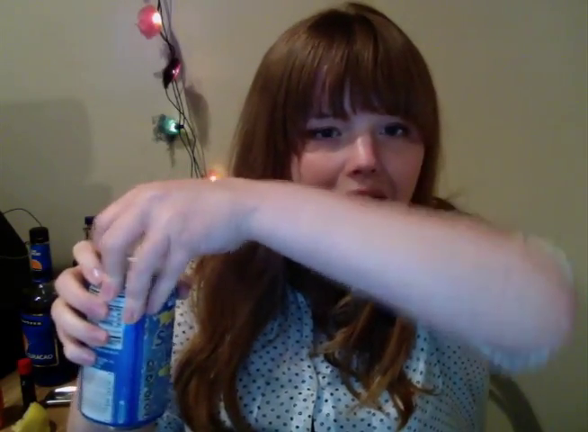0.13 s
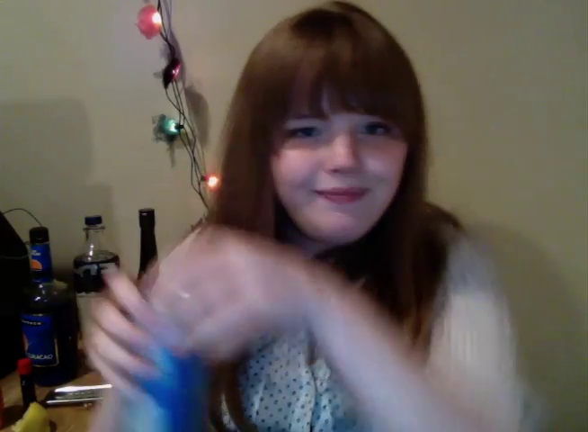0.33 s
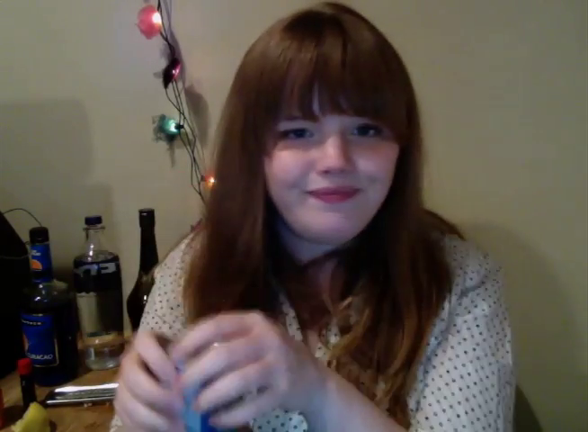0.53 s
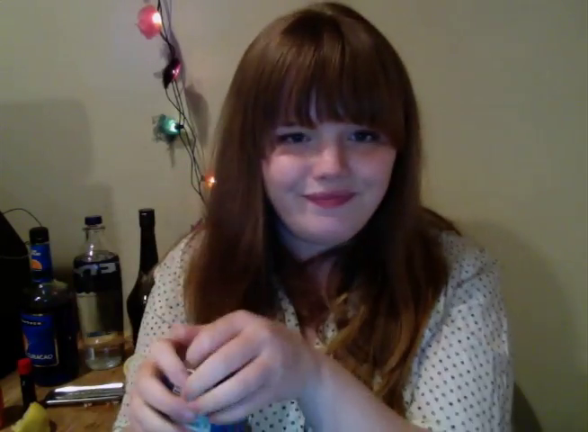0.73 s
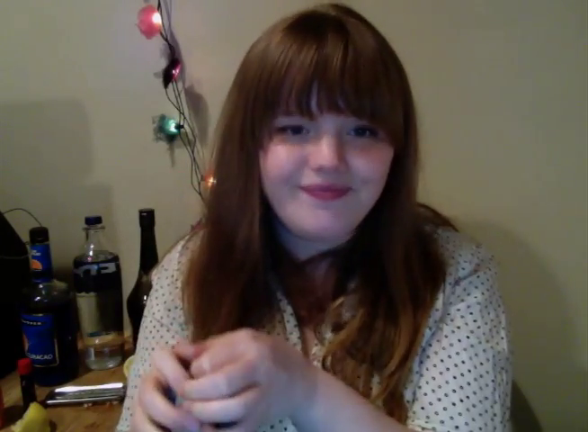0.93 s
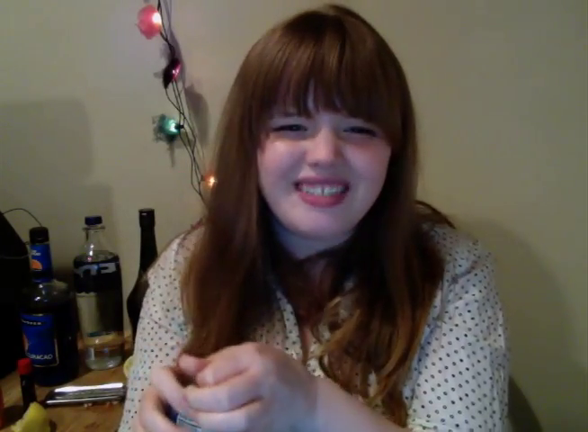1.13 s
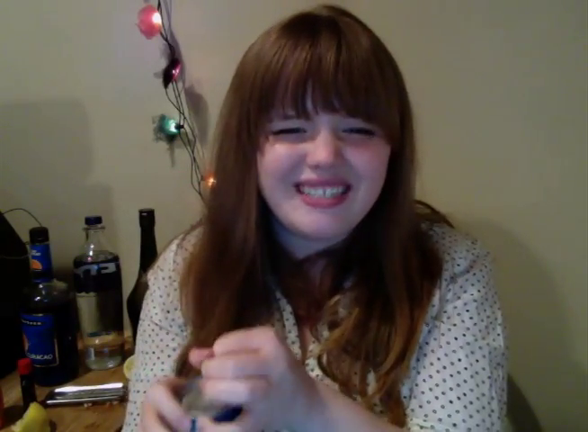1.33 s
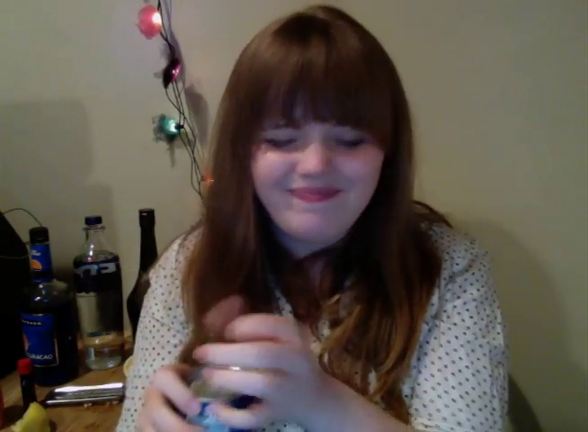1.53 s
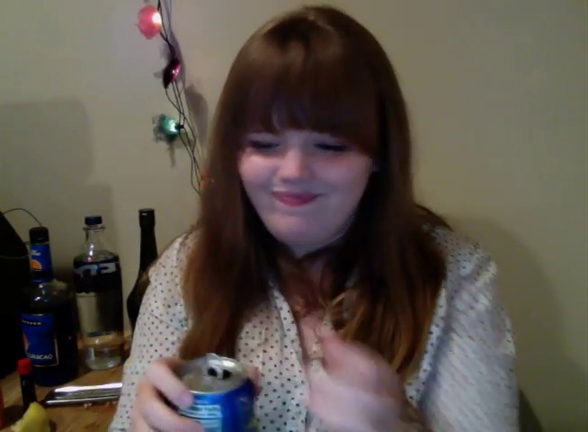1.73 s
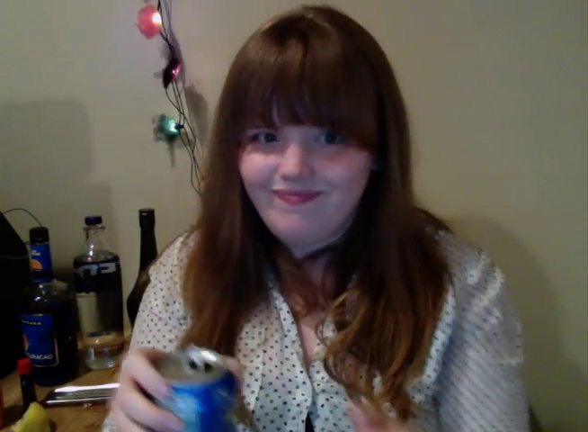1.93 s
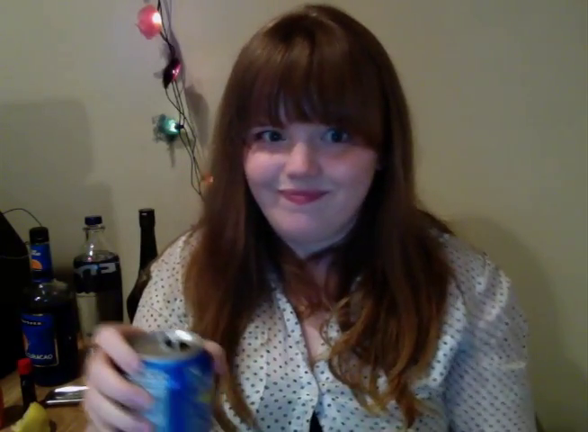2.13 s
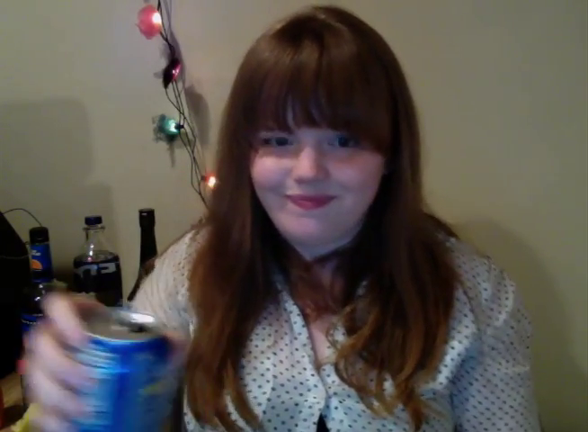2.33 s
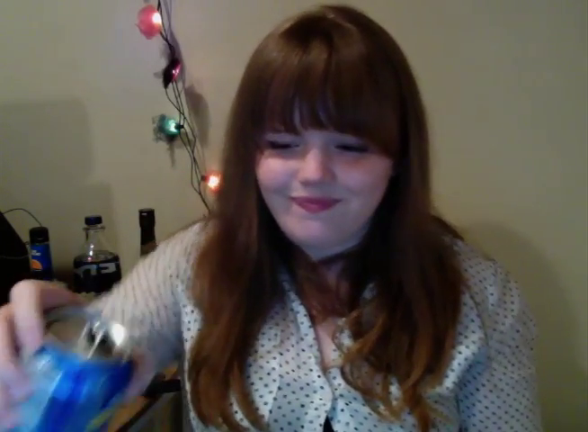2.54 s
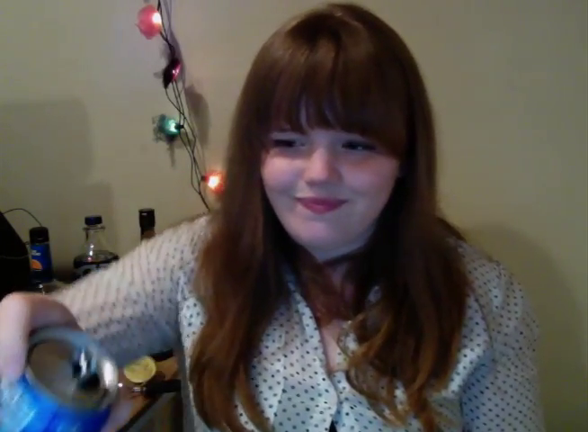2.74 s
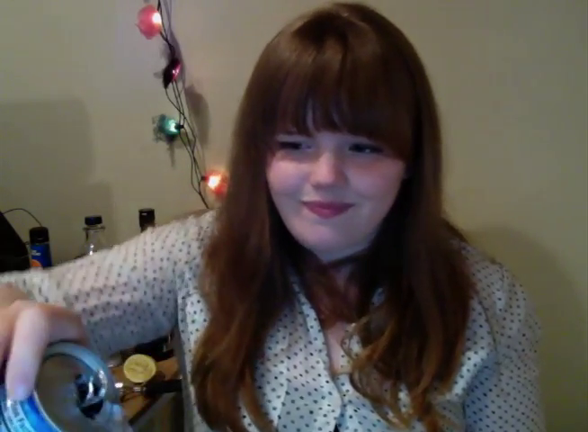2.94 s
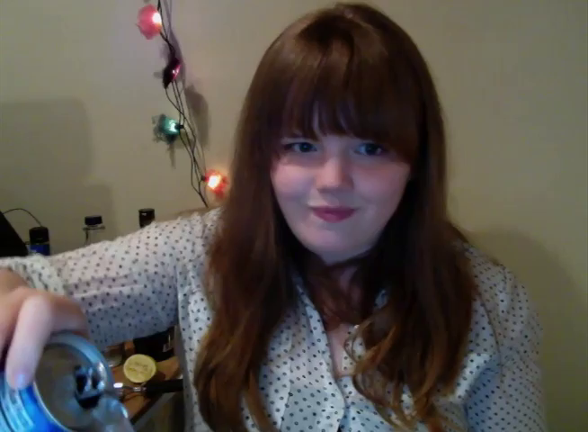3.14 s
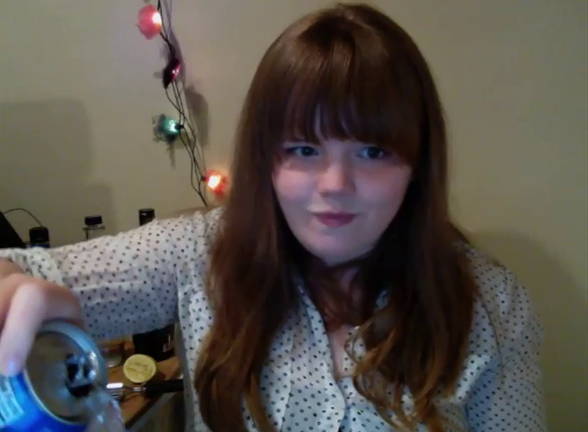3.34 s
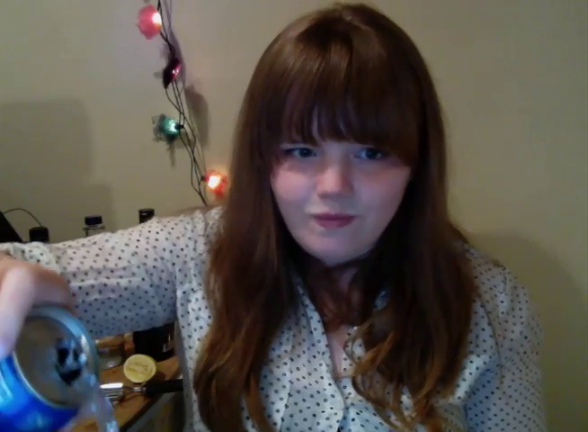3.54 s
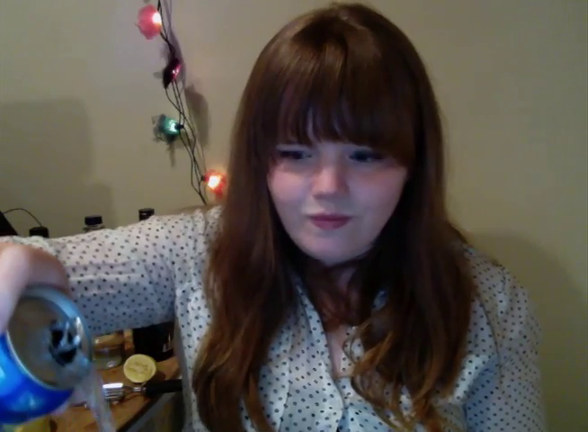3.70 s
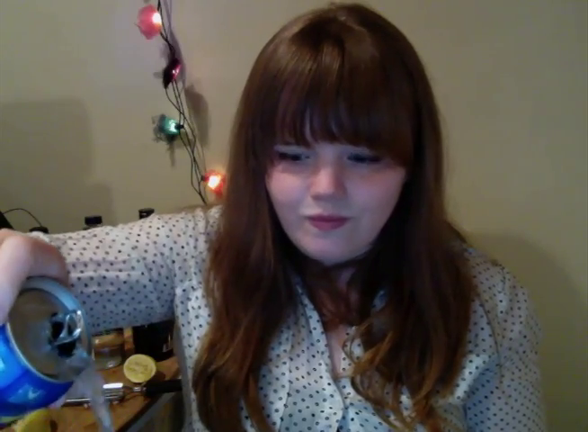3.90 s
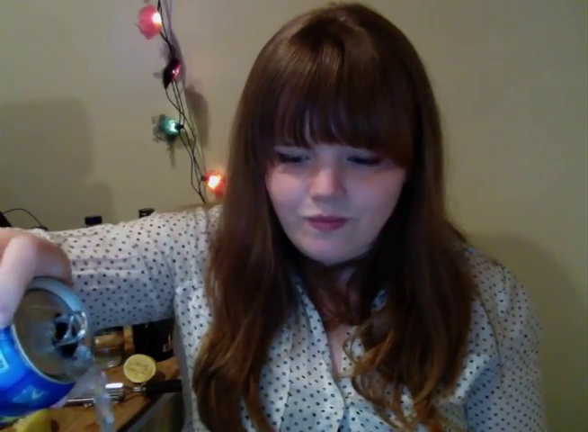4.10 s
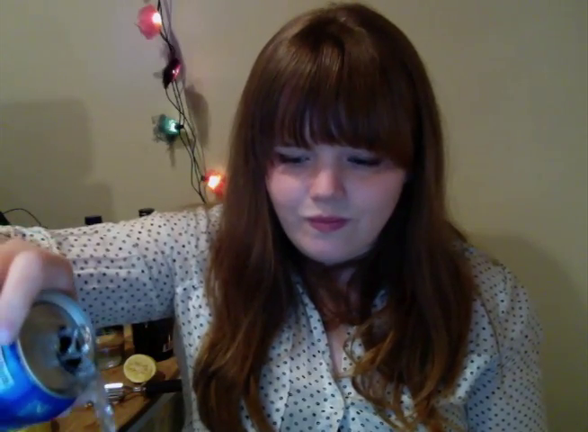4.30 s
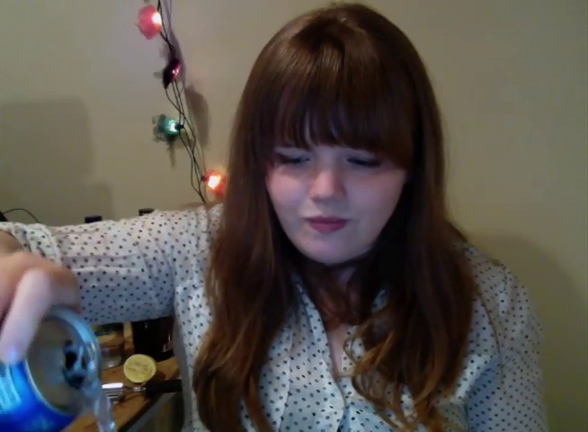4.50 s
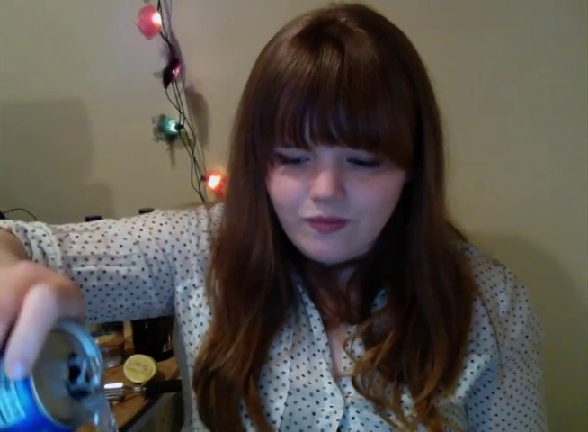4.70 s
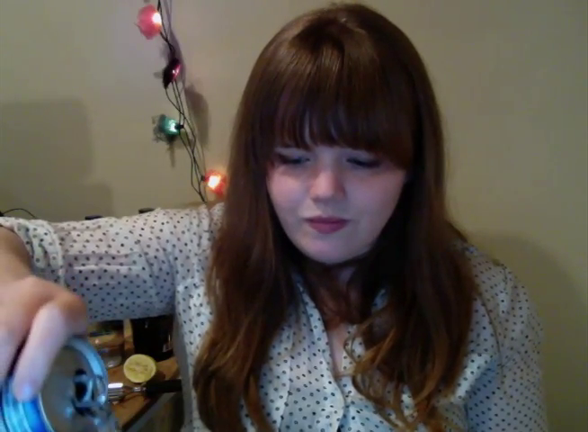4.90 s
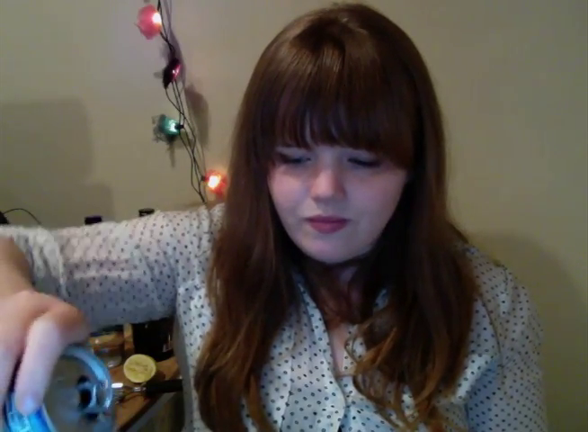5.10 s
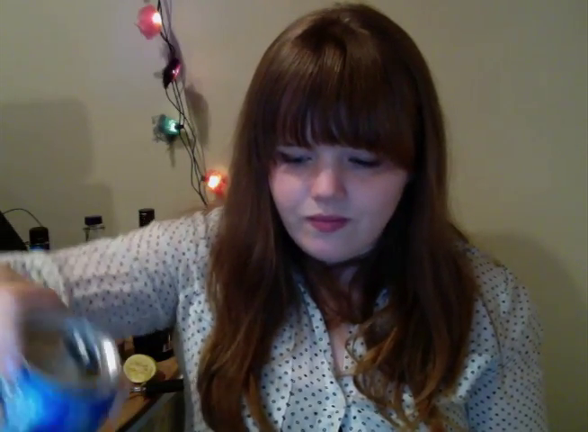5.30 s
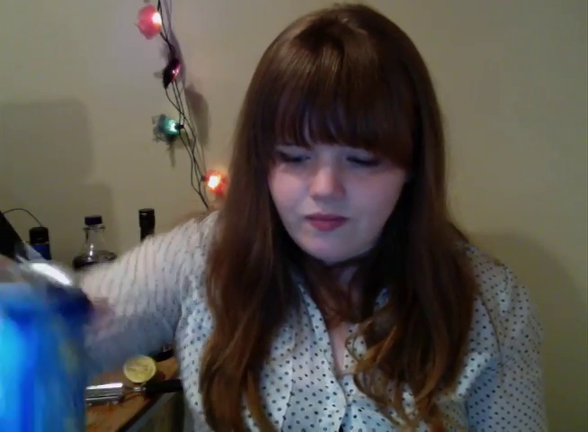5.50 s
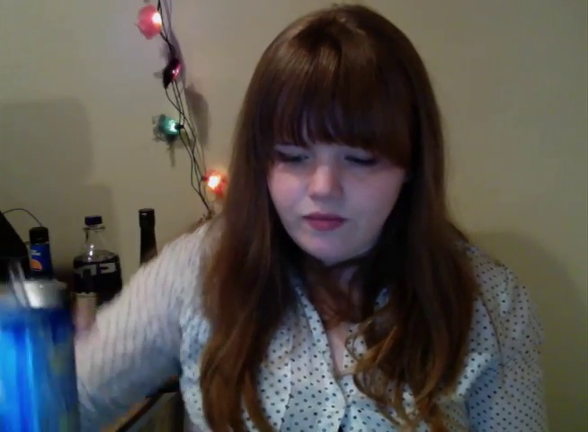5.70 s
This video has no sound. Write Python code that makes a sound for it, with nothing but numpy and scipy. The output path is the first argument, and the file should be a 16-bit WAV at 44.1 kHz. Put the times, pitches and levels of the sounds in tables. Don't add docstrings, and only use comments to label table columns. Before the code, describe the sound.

Faint ticks, a loud metallic can opening with a clipped hiss and thunk, a pause, then a bubbly, glugging pour that fizzes out.

```python
import sys
import numpy as np
from scipy import signal
from scipy.fft import rfft, irfft, next_fast_len
from scipy.io import wavfile

SR = 44100
rng = np.random.default_rng(int(sys.argv[2]) if len(sys.argv) > 2 else 0)


def wav_out(sig):
    wavfile.write(sys.argv[1], SR, np.round(np.clip(np.atleast_2d(sig).T, -1, 1) * 32767).astype(np.int16))


def volts_from_decibels(level):
    exponent = np.asarray(level, float) / 20
    return 10 ** exponent


N = 258029

# (frequency [Hz], density [dB per Hz])
HUSH_COLOUR = [(30, -14), (60, -21), (88, -24.5), (112, -1.5), (200, -1), (330, -1.5), (420, -10.5),
               (800, -13.5), (2200, -22.5), (2800, -19.5), (5000, -27), (16000, -38)]
# (time [s], level [dB])
HUSH_LEVEL = [(0, -59), (1.0, -62.5), (1.4, -56.5), (2.05, -61), (2.35, -66), (2.95, -64.5), (3.2, -57.5),
              (3.9, -55.5), (5.85, -60.5)]
# (frequency [Hz], width [Hz], level [dB])
FAN_LINES = [(59.3, 4, -17), (114.5, 5.5, -16.5), (349.2, 0.72, 3), (775, 1.7, -11.5), (2780, 15, -17),
             (13006, 3, -27)]
# (onset time [s], level [dB], fade [dB per s])
HISSES = [
    (0, -84, 19),
    (1.3, -56, 19.5),
    (4.9, -66, 15.5),
]

# (time [s], peak level [dB])
NAIL_TAP = (0.1375, -51)
# (frequency [Hz], level [dB], t60 [s])
CAN_MODES = [(924, 3, 0.12), (1880, 5, 0.046), (1950, 10, 0.056), (3365, 1, 0.059), (3420, -3, 0.061),
             (4230, 7, 0.03), (4870, -1, 0.03), (5600, 6, 0.032), (5670, 2, 0.035), (6760, 2, 0.054),
             (6750, -2, 0.06), (8440, -5, 0.061)]
# (time [s], peak level [dB], pitch [Hz], ring [cycles])
TICKS = [(0.568, -41.5, 1950, 35), (0.612, -51, 10100, 53), (0.615, -45, 4750, 26), (0.622, -48, 5700, 75),
         (0.884, -37, 9574, 40), (0.885, -40, 10400, 36), (0.891, -46.5, 10000, 30),
         (0.921, -50, 12200, 45), (0.921, -48, 14390, 46), (0.926, -58, 2180, 51), (0.921, -50, 13390, 45),
         (2.46, -54, 2370, 33), (5.655, -48, 4996, 44)]

# (time [s], peak level [dB], low ring [Hz], tab ring level [dB], crack level [dB])
SNAPS = [
    (0.9612, 0, 2033, -1.5, -16),
    (1.1149, -18.5, 2603, -6, 0),
    (1.1185, -4, 2300, 3, -4.5),
    (1.1262, -8.5, 2309, 5, -5),
]
# (frequency [Hz], level [dB], t60 [s])
LID_MODES = [(1100, -19.5, 0.019), (2430, -4.5, .005), (5450, -14, 0.006), (1550, -10, .006),
             (3900, -20, .006), (6500, -15, .006)]
# (time [s], level [dB])
JET_LEVEL = [
    (1.113, -82.5),
    (1.119, -21),
    (1.143, -43),
    (1.151, 4),
    (1.172, -5),
    (1.2, -15),
    (1.25, -19),
    (1.3, -34.5),
    (1.4, -84),
]
# (frequency [Hz], density [dB per Hz])
JET_COLOUR = [(59, -64), (100, -39.5), (335, -20), (634, -31), (1100, -0.5), (1450, -14), (2220, 0),
              (3320, -8), (4020, 3.5), (4900, -6), (6840, -13), (8460, -6), (11900, -8), (16000, -19)]
# (frequency [Hz], width [Hz], level [dB])
JET_RINGS = [(1290, 300, -15), (2400, 840, -27), (4250, 460, -14), (5630, 430, -14)]
# (time [s], peak level [dB], pitch [Hz], ring [cycles])
THUNKS = [
    (1.15, 0, 1050, 24),
    (1.2215, 12.5, 1127, 15),
    (1.229, -0.5, 965, 24),
]
# (time [s], peak level [dB], pitch [Hz], ring [cycles])
TABLE_KNOCKS = [
    (1.15, -24, 304.4, 8),
    (1.15, -44, 110, 4),
    (1.225, -36, 50, 5),
    (1.225, -30.5, 300, 8),
    (2.988, -50, 90, 5),
]
TAB_HZ, TAB_SAG_HZ_PER_S = 5800, 320000

# (time [s], level [dB])
STREAM_LEVEL = [
    (2.97, -59),
    (3.04, -44),
    (3.65, -45.5),
    (3.92, -36),
    (4.3, -42.5),
    (4.57, -48.5),
    (4.74, -57.5),
    (5.1, -54),
    (5.45, -91),
]
# (time [s], peak level [dB], pitch [Hz], ring [cycles])
SPLASH = [(2.983, -36, 910, 9.1), (2.983, -33.5, 2500, 22), (2.988, -20.5, 1640, 27),
          (2.988, -38, 3500, 40), (2.988, -23, 6500, 24), (2.988, -6.5, 7900, 4.2),
          (2.997, -19.5, 3950, 29), (3.0, -9, 7700, 5.7), (2.996, -24, 2260, 35), (3.018, -25, 2370, 30),
          (2.998, -29.5, 4700, 70), (3.005, -28.5, 5600, 67), (3.16, -32, 1150, 15), (3.13, -33, 1100, 14),
          (3.48, -35, 1130, 16), (3.8, -31, 940, 14), (3.078, -22, 354, 6.8), (3.429, -27, 420, 8.5),
          (3.822, -26, 470, 7.4), (3.5, -27, 440, 7)]
# (time [s], peak level [dB], pitch [Hz])
GLUGS = [(2.988, -13, 686), (3.017, -20.5, 674), (3.078, -22, 684), (3.114, -31, 785), (3.142, -32, 729),
         (3.429, -28, 806), (3.451, -31, 857), (3.524, -40, 976), (3.788, -26.5, 960), (3.82, -27, 925),
         (3.868, -16.5, 884), (3.913, -22.5, 725), (3.948, -24.5, 960), (3.978, -25.5, 880),
         (4.004, -28, 705), (4.037, -19.5, 735), (4.072, -27, 735), (4.097, -16, 1034), (4.143, -32, 756),
         (4.18, -27, 775), (4.209, -16, 718), (4.266, -28, 826), (4.2905, -15, 877), (4.3125, -18, 800),
         (4.375, -17.5, 890), (4.469, -21, 900), (4.511, -28, 870), (4.58, -29.5, 960),
         (4.961, -31.5, 1036), (5.135, -31, 899)]
# (time [s], peak level [dB], pitch [Hz])
PLOPS = [(3.193, -36, 1000), (3.566, -47, 739), (3.583, -36, 790), (3.641, -53, 950), (3.671, -51, 766),
         (3.703, -36.5, 734), (3.755, -31, 993), (3.857, -23, 896), (4.047, -32, 770), (4.11, -23, 1060),
         (4.23, -22.5, 730), (4.405, -38, 980), (4.481, -24.5, 840), (4.609, -44, 946), (4.65, -33.5, 820),
         (4.716, -39, 972), (4.793, -64, 810), (4.807, -46.5, 983), (4.937, -48.5, 1100),
         (4.985, -34.5, 1053), (5.03, -50, 796), (5.056, -45, 788), (5.112, -37.5, 856), (5.157, -41, 960)]
# (time [s], peak level [dB], pitch [Hz])
BUBBLES = [(2.987, -1, 2400), (3.1133, -42, 1690), (3.1306, -36.5, 1360), (3.1498, -37, 2540),
           (3.1988, -29, 2700), (3.4655, -32, 2320), (3.6264, -37, 2530), (3.7125, -35.5, 2370),
           (3.912, -30, 1600), (3.947, -31, 1660), (4.013, -25, 3200), (4.0355, -29, 1570),
           (4.097, -26, 1540), (4.1845, -31, 1430), (4.2115, -32, 1040), (4.262, -31, 1560),
           (4.29, -34, 1560), (4.383, -35, 1530), (4.4726, -32, 1045), (4.508, -29, 2810),
           (4.6073, -33.5, 2860), (4.7435, -33, 2400), (4.9863, -36, 1474), (5.011, -29, 2800)]
# (time [s], peak level [dB], pitch [Hz])
BEADS = [(2.9877, -18, 3320), (3.235, -39, 4170), (3.2598, -34, 5620), (3.361, -40, 5670), (3.4, -31, 5390),
         (3.468, -35.5, 4300), (3.707, -40, 5600), (3.738, -33, 4280), (3.757, -29, 5300),
         (3.792, -29, 4160), (3.823, -23, 4900), (3.867, -30, 5250), (3.9122, -25.5, 4120),
         (3.981, -31, 5400), (4.0142, -27, 4540), (4.1889, -47, 5100), (4.2316, -27.5, 5400),
         (4.2894, -31, 4620), (4.3125, -23, 5340), (4.4383, -45, 5700), (4.4532, -39, 3450),
         (4.568, -37, 4140), (4.6049, -37, 4400), (4.6465, -40, 5370), (4.978, -35.5, 6170),
         (5.011, -35, 3200), (5.0973, -46, 4160)]
# (time [s], peak level [dB], pitch [Hz])
BLIPS = [(3.2, -32, 1820), (3.2822, -48, 1430), (3.344, -58, 1510), (3.4269, -42, 2400),
         (3.6055, -42, 2400), (3.7561, -31, 2670), (3.8674, -39, 2200), (4.2096, -25, 1880),
         (4.365, -57, 2290), (4.383, -35, 1900), (4.392, -38, 2720), (4.51, -34.5, 2300), (4.61, -42, 1880),
         (4.6496, -46, 1680), (4.664, -44.5, 3320), (4.715, -56.5, 2450), (4.7444, -41, 1710),
         (4.8247, -49.5, 1485), (4.8247, -47, 3040), (4.8761, -51.5, 2650), (4.9379, -53, 1400),
         (5.139, -43, 1380), (5.2348, -58, 3400), (3.1819, -42, 5650), (3.5201, -46, 5640),
         (3.5376, -38.5, 4400), (3.573, -42, 5130), (3.6249, -48, 5490), (3.6813, -39, 5600),
         (4.1293, -35, 3270), (4.4934, -44, 3480), (4.5099, -35, 4260), (3.83, -22, 4750)]
# (time [s], peak level [dB], first pitch [Hz], last pitch [Hz],
# length [s])
GULPS = [(3.194, -46, 1900, 2600, 0.014), (3.326, -35.5, 742, 736, 0.065), (3.378, -41, 750, 763, 0.024),
         (3.37, -42, 1740, 3340, 0.016), (3.465, -40.5, 2400, 3930, 0.0068),
         (4.039, -28.5, 887, 1010, 0.014), (3.868, -31, 950, 1000, 0.02), (3.788, -30.5, 997, 1026, 0.021),
         (3.52, -40, 988, 1000, 0.023), (3.603, -39.5, 910, 980, 0.011), (4.258, -31, 816, 893, 0.034),
         (4.645, -34.5, 779, 884, 0.058), (5.006, -39.5, 2830, 2776, 0.051),
         (5.066, -41.5, 770, 800, 0.021), (4.402, -29, 920, 1050, 0.014), (2.992, -30, 700, 694, 0.074),
         (3.051, -28.5, 2560, 2760, 0.013), (3.076, -39.5, 2600, 2700, 0.011),
         (3.085, -39, 690, 740, 0.042), (3.786, -35, 2300, 3060, 0.0116), (3.976, -32, 1890, 3000, 0.0094),
         (4.033, -33, 3000, 3620, 0.007), (4.042, -33.5, 2760, 3500, 0.0068),
         (4.185, -36, 2200, 3280, 0.01), (4.209, -36.5, 1650, 2800, 0.0159), (4.45, -35, 3900, 3200, 0.008),
         (4.486, -36.5, 2500, 3700, 0.014), (4.948, -46, 5700, 6300, 0.008),
         (5.018, -54.5, 6000, 5700, 0.01), (5.135, -45.5, 997, 1510, 0.016),
         (4.233, -40.5, 4000, 4300, 0.011), (4.187, -42, 4600, 4700, 0.0078),
         (4.096, -35, 2000, 3200, 0.006)]
# (time [s], peak level [dB], pitch [Hz])
SPRAY = [(3.1552, -33, 8170), (3.2133, -33.5, 8700), (3.2617, -22, 6720), (3.3284, -40, 6760),
         (3.402, -32.5, 8900), (3.5, -36, 9600), (3.565, -33, 7500), (3.68, -28.5, 6860),
         (3.7247, -31, 7000), (3.7562, -19.5, 8350), (3.8233, -25.5, 8150), (3.8576, -29, 7340),
         (3.948, -33, 6330), (4.0425, -32, 9400), (4.0976, -51, 6760), (4.1425, -69, 9500),
         (4.2288, -42, 6830), (4.268, -37, 6900), (4.316, -22, 6830), (4.4407, -42, 7000),
         (4.508, -33, 7000), (4.5326, -63, 6640), (4.6088, -27.5, 7100), (4.8793, -40, 9410),
         (4.9826, -41, 6950), (5.1124, -39, 8300), (5.1905, -40, 7740)]
# (time [s], peak level [dB], pitch [Hz])
MIST = [(3.052, -32.5, 11800), (3.1403, -44, 10100), (3.212, -37, 10300), (3.239, -39, 9700),
        (3.381, -28.5, 9500), (3.401, -29, 10200), (3.497, -29.5, 10500), (3.573, -28.5, 12300),
        (3.6597, -31.5, 9900), (3.68, -30, 9600), (3.703, -28, 9800), (3.7568, -21.5, 10240),
        (3.821, -25.5, 11200), (3.8585, -32, 9700), (3.913, -23, 10760), (4.045, -29.5, 9900),
        (4.077, -46, 11000), (4.1075, -33, 10000), (4.144, -29, 11000), (4.2487, -31.5, 11000),
        (4.2679, -29, 9300), (4.289, -47, 9500), (4.338, -24, 10350), (4.4398, -40.5, 9300),
        (4.507, -33, 11900), (4.6236, -40, 10000), (4.657, -32.5, 10700), (4.8826, -36, 10540),
        (5.067, -41, 13500), (5.4772, -46.5, 9760)]
# (time [s], peak level [dB], pitch [Hz])
STRAY_DROPS = [(3.1176, -39.5, 10200), (3.1909, -41, 9680), (3.3281, -41, 8800), (3.3545, -34, 10500),
               (3.62, -37, 8700), (3.6446, -34, 9000), (4.018, -38, 8800), (4.602, -37, 12200),
               (4.8162, -58, 12200), (4.959, -41, 5750), (4.961, -42, 11600), (5.012, -40.5, 7400),
               (5.188, -38, 9700), (5.207, -52, 9700), (5.3158, -57, 8200), (5.4172, -63.5, 13900)]
# (frequency [Hz], level [dB], t60 [s])
JAR_MODES = [(772, -65, 0.094), (960, -47.5, 0.059), (2680, -62, 0.073), (5490, -35.5, 0.0054),
             (5620, -27.5, 0.016), (6810, -41.5, 0.045), (8350, -46, 0.044)]
GLUG_CYCLES, BUBBLE_CYCLES, BEAD_CYCLES, DROP_CYCLES = 14.4, 35.4, 47, 78
DAMPING_PER_DB = 0.4686
GURGLE_LINGERS_S, FIZZ_LINGERS_S = 0.13, 0.083
THROB_HZ, THROB_DEPTH = 56.7, 0.22
BROOD_S, BROOD_DB, BROOD_SPREAD, BROOD_CYCLES = 0.045, -5, 0.16, 46

# (frequency [Hz], t60 [s])
ROOM_T60 = [(100, 0.13), (500, 0.077), (800, 0.36), (1200, 0.42), (3500, 0.49), (8000, 0.37), (15000, 0.2)]
# (delay [s], level [dB])
ECHOES = [(.0035, -14), (.007, -8.5), (.012, -16.5)]
POUR_TAIL_DB = -11.5


def rms_one(x):
    return x / np.sqrt(np.mean(x ** 2) + 1e-20)


def level_curve(rows):
    s, level_db = np.transpose(rows)
    return np.interp(np.arange(N) / SR, s, level_db)


def at_hz(points, hz):
    table_hz, values = np.array(points).T
    return np.interp(np.log(hz), np.log(table_hz), values)


def coloured(spectrum):
    size = next_fast_len(N)
    hz = np.maximum(np.arange(size // 2 + 1) * SR / size, 1)
    white = rfft(rng.standard_normal(size))
    return rms_one(irfft(white * volts_from_decibels(at_hz(spectrum, hz)), size)[:N])


def whine(rows):
    t = np.arange(N) / SR
    out = np.zeros(N)
    for hz, width, db in rows:
        wander = np.sqrt(2 * np.pi * width / SR) * np.cumsum(rng.standard_normal(N))
        out += volts_from_decibels(db) * np.sin(2 * np.pi * hz * t + wander)
    return out


def hush():
    return volts_from_decibels(level_curve(HUSH_LEVEL) - 3.0) * (coloured(HUSH_COLOUR) + whine(FAN_LINES))


def seething():
    t = np.arange(N) / SR
    level = sum(volts_from_decibels(db - fade * (t - s)) * (t >= s) for s, db, fade in HISSES)
    return level * coloured([(300, -34.0), (900, 0), (4000, -3.5), (9000, -13.5), (16000, -33.0)])


def ring(x, hz, t60):
    radius = volts_from_decibels(-60 / (t60 * SR))
    angle = 2 * np.pi * min(hz, 20000) / SR
    poles = [1, -2 * radius * np.cos(angle), radius * radius]
    return signal.lfilter([0, np.sin(angle)], poles, x + 1e-18)


def add(out, s, sound):
    i = round(s * SR)
    out[i:i + len(sound)] += sound[:N - i]


def pops(rows, rise, attack_cycles):
    out = np.zeros(N)
    for (s, db, hz, cycles), climb in zip(rows, np.broadcast_to(rise, len(rows))):
        turns = np.arange(int(max(cycles, 1) / hz * SR) + 2) * hz / SR
        bent_turns = turns + climb * (turns ** 2 / cycles - turns / 4)
        swell = np.sin(np.pi / 2 * np.minimum(turns / attack_cycles, 1)) ** 2
        add(out, s, volts_from_decibels(db - 60 * turns / cycles) * swell * np.sin(2 * np.pi * bent_turns))
    return out


def touches():
    out = pops(TICKS, rise=0, attack_cycles=4.0)
    tap_s, tap_db = NAIL_TAP
    contact = np.zeros(9000)
    contact[:130] = volts_from_decibels(tap_db - 21) * rng.standard_normal(130) * np.hanning(130)
    contact[290:340] = volts_from_decibels(tap_db - 20.0) * rng.standard_normal(50)
    add(out, tap_s - 0.001, sum(volts_from_decibels(db) * ring(contact, hz, t60) for hz, db, t60 in CAN_MODES))
    return out


def snaps():
    out, t = np.zeros(N), np.arange(2100) / SR
    body = sum(np.sin(2 * np.pi * hz * t) * volts_from_decibels(db - 60 * t / t60) for hz, db, t60 in LID_MODES)
    body *= np.minimum(t / 0.0006, 1)
    tab_hz = TAB_HZ - TAB_SAG_HZ_PER_S * np.minimum(t, 0.005) / 2
    crack_band = signal.butter(2, [4000, 11000], "band", fs=SR)
    for s, db, low_hz, tab_db, crack_db in SNAPS:
        low = -1.6 * np.sin(2 * np.pi * low_hz * t) * volts_from_decibels(-60 * t / 0.0055) * np.minimum(t / 0.00054, 1)
        tab = np.sin(2 * np.pi * tab_hz * t) * volts_from_decibels(tab_db - 60 * t / 0.015) * np.minimum(t / 0.0008, 1)
        crack = signal.lfilter(*crack_band, rng.standard_normal(len(t)))
        crack *= volts_from_decibels(crack_db + 3.0 - 60 * t / 0.045)
        add(out, s, volts_from_decibels(db) * (low + tab + crack + body))
    return out


def whistles(rows):
    out = np.zeros(N)
    for hz, width, db in rows:
        t60 = np.log(1000) / np.pi / width
        out += volts_from_decibels(db) * rms_one(ring(rng.standard_normal(N), hz, t60))
    return out


def gas_jet():
    return volts_from_decibels(level_curve(JET_LEVEL)) * (coloured(JET_COLOUR) + whistles(JET_RINGS))


def opening():
    return snaps() + gas_jet() + pops(THUNKS, rise=0, attack_cycles=1.7)


def ringing(rows, cycles):
    return [(s, db, hz, max(cycles * volts_from_decibels(-DAMPING_PER_DB * (db + 17.0)), 3)) for s, db, hz in rows]


def bubbles():
    rows = ringing(BUBBLES, BUBBLE_CYCLES) + ringing(BEADS, BEAD_CYCLES)
    rising = volts_from_decibels(-1.5) * pops(rows, rise=0.18, attack_cycles=2.5)
    return rising + volts_from_decibels(3.0) * pops(ringing(BLIPS, cycles=14.6), rise=0, attack_cycles=1.35)


def chirps():
    rows = [(s, db - 17, 0.96 * hz, 32) for s, db, hz in GLUGS]
    return pops(rows, rise=0.97, attack_cycles=2.0)


def glugs():
    pockets = volts_from_decibels(2.0) * pops(ringing(GLUGS + PLOPS, GLUG_CYCLES), rise=0.059, attack_cycles=1.21)
    thumps = [(s, db - 15.5, 0.61 * hz, 6.8) for s, db, hz in GLUGS[1:]]
    return pockets + chirps() + pops(thumps, rise=0.21, attack_cycles=0.35)


def gulps():
    out = np.zeros(N)
    for s, db, first_hz, last_hz, length in GULPS:
        u = np.linspace(0, 1, int(length * SR))
        phase = 2 * np.pi * np.cumsum(first_hz + (last_hz - first_hz) * u) / SR
        swell = np.sin(np.pi * u ** 0.83)
        throb = 1 - THROB_DEPTH * np.cos(2 * np.pi * THROB_HZ * length * u)
        add(out, s, volts_from_decibels(db) * swell * throb * np.sin(phase))
    return out


def cracks(rows):
    out, n = np.zeros(N), np.arange(400)
    fade = volts_from_decibels(-60 * n / SR / 0.016) * np.minimum(n / 12, 1)
    for (s, db, hz), noise in zip(rows, rng.standard_normal((len(rows), 400))):
        band = signal.butter(2, [0.72 * hz, min(1.55 * hz, 19000)], "band", fs=SR, output="sos")
        add(out, s, volts_from_decibels(db) * rms_one(signal.sosfilt(band, noise * fade)) * fade)
    return out


def droplets():
    rows = [(s, db, hz, DROP_CYCLES) for s, db, hz in SPRAY + MIST + STRAY_DROPS]
    rows += [(s + 0.00075, db - 6, 1.2 * hz, DROP_CYCLES) for s, db, hz in MIST]
    return volts_from_decibels(2.0) * pops(rows, rise=0.03, attack_cycles=5.5)


def grains(count, low_hz, high_hz, cycles, spread_db):
    when, size, pitch, length, slope = rng.random((count, 5)).T
    start = 2.99 + 2.45 * when
    level = spread_db * np.minimum(-np.log(size), 3)
    hz = low_hz * (high_hz / low_hz) ** pitch
    rows = np.c_[start, level, hz, cycles * (0.3 + 1.4 * length)]
    sound = pops(rows, rise=1.1 * slope ** 2 - 0.08, attack_cycles=1.63)
    return rms_one(sound) * np.sqrt(SR * 2.45 / N)


def cloud(rows, t60):
    marks = np.zeros(N)
    for s, db, _ in rows:
        marks[round(s * SR)] += volts_from_decibels(db)
    return signal.lfilter([1], [1, -volts_from_decibels(-60 / (t60 * SR))], marks)


def bubble_bed():
    flow_db = level_curve(STREAM_LEVEL)
    gurgle = volts_from_decibels(flow_db - 9.0) + volts_from_decibels(-32.0) * cloud(GLUGS, GURGLE_LINGERS_S)
    bubbling = volts_from_decibels(flow_db - 11.5) + volts_from_decibels(-27.5) * cloud(GLUGS, t60=0.14)
    fizz = volts_from_decibels(flow_db - 24) + volts_from_decibels(-16.5) * cloud(SPRAY + MIST, FIZZ_LINGERS_S)
    slosh = volts_from_decibels(-25.5 + 0.21 * (flow_db + 48)) * cloud(GLUGS, t60=0.18)
    bed = gurgle * grains(count=400, low_hz=702, high_hz=1240, cycles=17.0, spread_db=2.5)
    bed += bubbling * grains(count=1900, low_hz=1097, high_hz=6080, cycles=40.7, spread_db=4.5)
    bed += volts_from_decibels(flow_db - 21.0) * grains(count=260, low_hz=5460, high_hz=5750, cycles=156.0, spread_db=11.5)
    bed += fizz * grains(count=1300, low_hz=6470, high_hz=13630, cycles=67.0, spread_db=6.0)
    bed += slosh * grains(count=420, low_hz=340, high_hz=640, cycles=11.2, spread_db=3.0)
    return bed


def pouring():
    water = pops(SPLASH, rise=0.016, attack_cycles=0.49)
    water += bubbles() + glugs() + gulps() + droplets() + bubble_bed()
    water += volts_from_decibels(-25) * cracks(MIST + SPRAY + STRAY_DROPS) + volts_from_decibels(-19.0) * cracks(GLUGS)
    return water + sum(volts_from_decibels(db) * ring(water, hz, t60) for hz, db, t60 in JAR_MODES)


def brood(count):
    parents = BUBBLES[1:] + BEADS[1:] + SPRAY + MIST[:26] + [row[:3] for row in GULPS if row[2] > 1500]
    s, db, hz = np.repeat(np.array(parents), count, axis=0).T
    late, size, pitch = rng.random((len(s), 3)).T
    start = s + 0.003 + BROOD_S * late
    level = db + BROOD_DB - 10 * late - 8 * size
    young_hz = hz * (1 + BROOD_SPREAD * (2 * pitch - 0.8))
    young = np.c_[start, level, young_hz, BROOD_CYCLES * (0.6 + size)]
    return pops(young, rise=0.4 * pitch, attack_cycles=2.3)


def room(x, tail_db, near_db, echo_db):
    t = np.arange(int(0.7 * SR)) / SR
    edges = 60 * 2 ** np.arange(0, 8.6, 0.5)
    white = rng.standard_normal((3, len(t)))
    tail = np.zeros(len(t))
    for k, (low, high) in enumerate(zip(edges, edges[1:])):
        octave_half = signal.butter(2, [low, high], "band", fs=SR, output="sos")
        t60 = at_hz(ROOM_T60, np.sqrt(low * high))
        tail += signal.sosfilt(octave_half, white[k % 2]) * volts_from_decibels(-60 * t / t60)
    tail *= 1 - np.exp(-(t / 0.019) ** 2)
    tail *= np.exp(-(t / 0.42) ** 8)
    near = white[2] * volts_from_decibels(-60 * t / 0.14) * (1 - np.exp(-(t / 0.005) ** 2))
    response = (volts_from_decibels(tail_db) * rms_one(tail) + volts_from_decibels(near_db) * rms_one(near)) / np.sqrt(len(t))
    response[0] += 1
    for s, db in ECHOES:
        smear = rng.standard_normal(80) * np.hanning(80)
        add(response, s, volts_from_decibels(db + echo_db) * rms_one(smear) / np.sqrt(80))
    return signal.fftconvolve(x, response)[:N]


def scene():
    near = room(opening(), tail_db=-8.5, near_db=-8.5, echo_db=-1.0)
    near += room(touches() + pouring(), POUR_TAIL_DB, near_db=-7.0, echo_db=-3.0)
    near += room(brood(count=5), POUR_TAIL_DB, near_db=-6.0, echo_db=-3.0)
    radiated = signal.butter(3, [380, 17500], "band", fs=SR, output="sos")
    knocks = pops(TABLE_KNOCKS, rise=0, attack_cycles=0.6)
    return (signal.sosfilt(radiated, near) + knocks + seething() + hush())[None]


def roll_off(x):
    return signal.sosfilt(signal.butter(12, 16370, fs=SR, output="sos"), x)


def record(dry):
    thin = signal.sosfilt(signal.butter(2, 55, "high", fs=SR, output="sos"), dry)
    clipped = np.clip(thin, -0.9, 0.9)
    mix = signal.sosfilt(signal.ellip(10, 0.5, 70, 15750, fs=SR, output="sos"), clipped)
    mix = signal.lfilter(*signal.butter(1, 45, "high", fs=SR), mix)
    return roll_off(mix)


dry = scene()
out = record(dry)
wav_out(out)
```